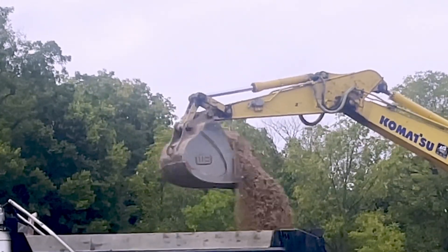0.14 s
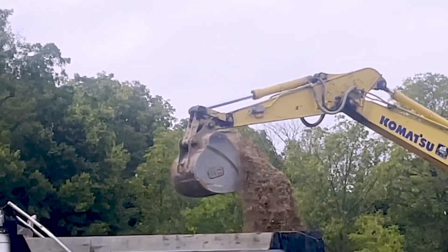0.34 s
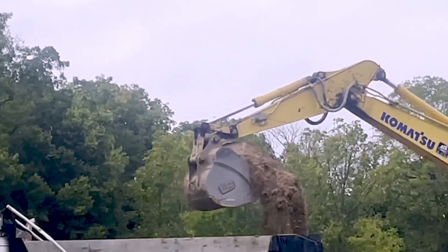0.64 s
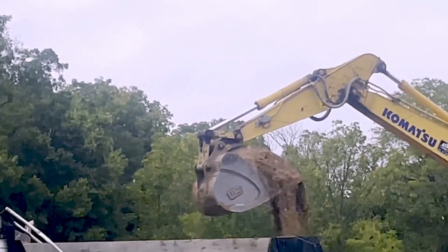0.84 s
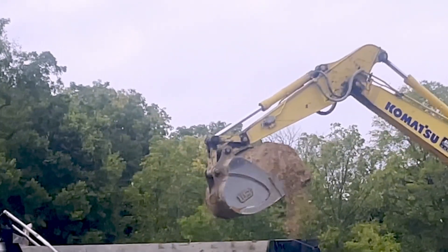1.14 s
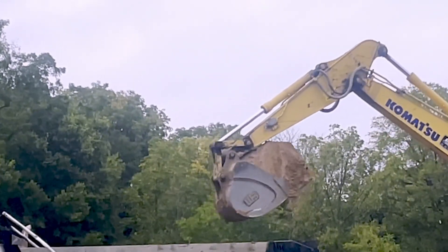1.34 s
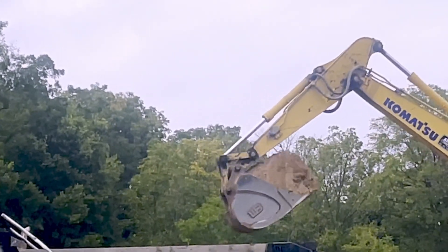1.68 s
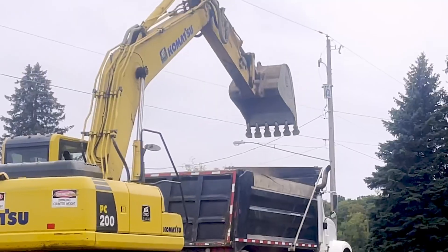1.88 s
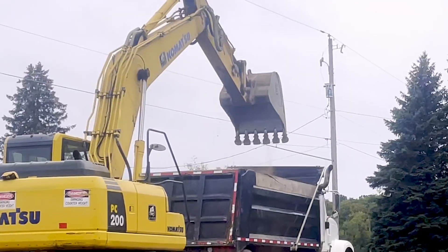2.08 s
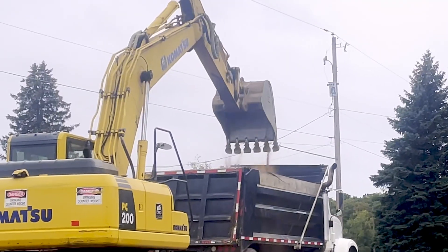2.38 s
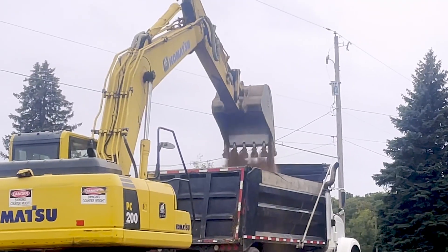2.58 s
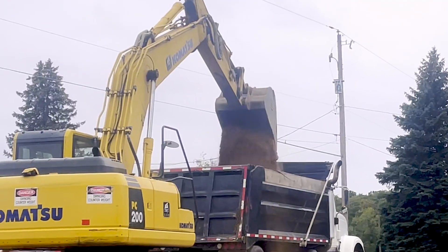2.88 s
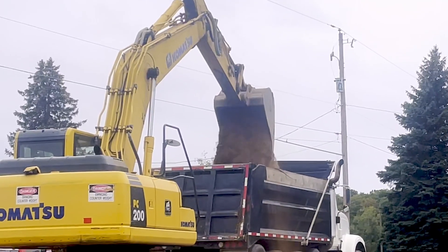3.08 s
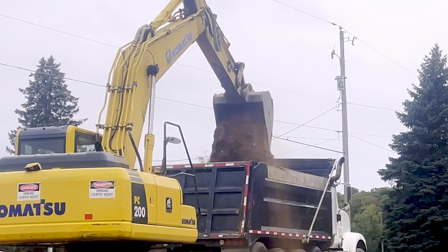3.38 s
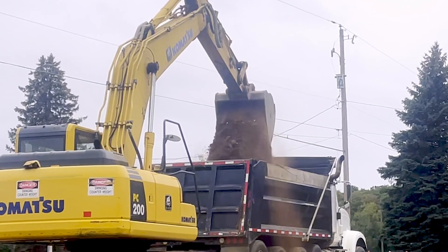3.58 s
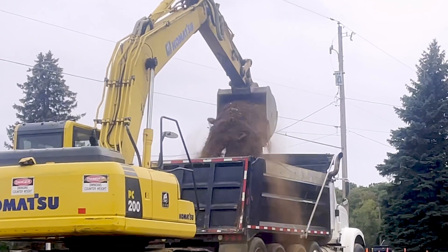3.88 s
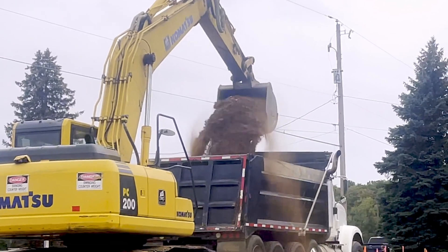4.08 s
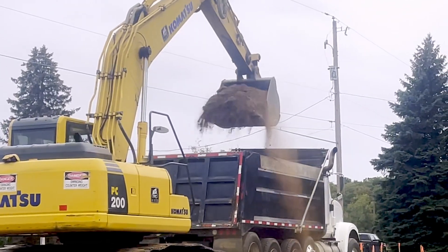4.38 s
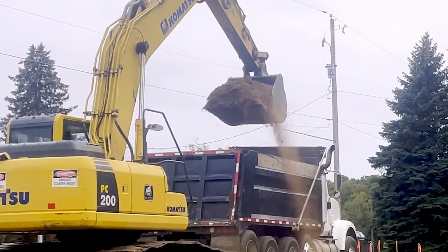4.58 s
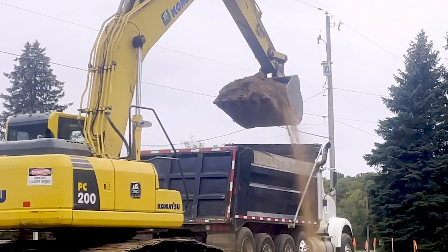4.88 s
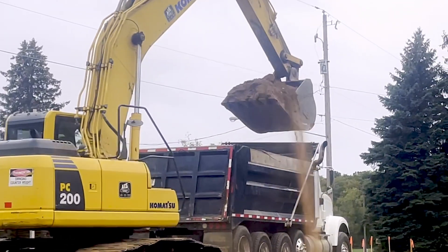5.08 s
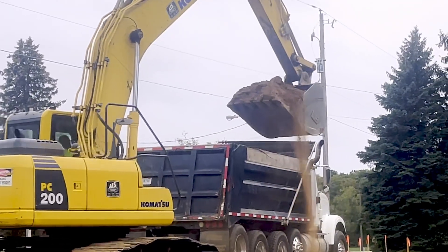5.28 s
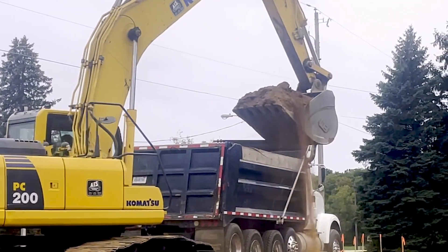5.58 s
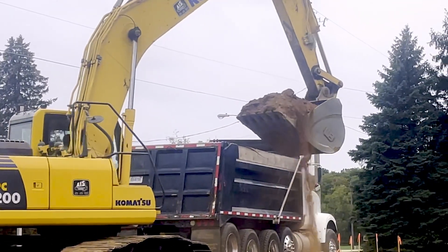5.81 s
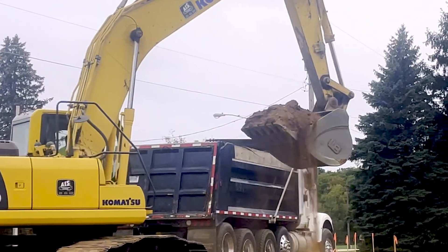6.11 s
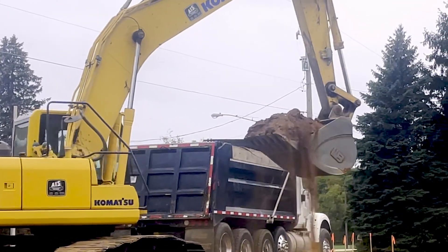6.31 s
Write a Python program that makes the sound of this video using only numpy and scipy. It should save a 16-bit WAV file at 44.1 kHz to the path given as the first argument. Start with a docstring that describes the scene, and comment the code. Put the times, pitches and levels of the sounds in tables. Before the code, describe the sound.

Outdoors, clods boom on a steel dump truck bed and dirt slides loudly, then thins out with a few knocks and a short rasp that sound played backwards. A diesel excavator throbs some way off. Before two seconds it jumps suddenly close, with a pump whine swelling on each stroke and a steady oil hiss. Light clanks and gritty ticks dot the engine noise, and the whine is strongest near the end.

```python
"""An excavator loading a truck, backwards

A diesel digger works over a steel dump truck with time running backwards: clods and stones swell out of
their own ring and stop dead on the blow, and the pour of dirt starts loud and thins away. The engine
throbs and the pump whines, first far off, then suddenly close, where oil hisses and the turbo whistles."""
import sys
import numpy as np
from scipy.fft import rfft, irfft, next_fast_len
from scipy.io import wavfile
from scipy.ndimage import map_coordinates

SR = 44100
rng = np.random.default_rng(int(sys.argv[2]) if len(sys.argv) > 2 else 0)


def dump(signal):
    """Clip the signal to [-1, 1] and save it as 16-bit WAV at the path in sys.argv[1]."""
    limited = np.clip(np.atleast_2d(signal).T, -1, 1)
    pcm = np.round(limited * 32767).astype(np.int16)
    wavfile.write(sys.argv[1], SR, pcm)


N = 284445
TIME = np.arange(N) / SR
CLOSE_S = 1.748  # the scene changes: from here on the digger is heard close by

# How often the cylinders fire: time_s, rate_hz
FIRING_RATE = [(0, 96), (.6, 95), (1.05, 97.8), (1.66, 97.8), (1.78, 95.1), (2.08, 94.8), (2.3, 97),
               (2.75, 99.9), (3.2, 99.7), (3.8, 97.2), (4.75, 96.9), (5.25, 94.4), (6.45, 94.3)]
# How loud the exhaust is from afar, close by, and in its close second harmonic: time_s, level_db
FAR_EXHAUST = [(0, -28.5), (.5, -30.5), (.9, -28.5), (1.3, -30.5), (1.74, -30)]
NEAR_EXHAUST = [(2.45, -21.5), (2.9, -21.5), (4.78, -23), (4.9, -20), (5.35, -20), (6.45, -22.5)]
SECOND_HARMONIC = [(1.75, -34), (2.55, -33), (2.8, -37.5), (3.3, -39), (3.8, -35.5), (5, -35), (5.4, -38),
                   (6.45, -38)]
# The exhaust's tones from afar, close by, and in its drone: multiple_of_firing_rate, level_db
FAR_TONES = [(4 / 6, -12), (5 / 6, -11.5), (0.98, 0), (8 / 6, -14), (11 / 6, -11), (2, -7.5),
             (13 / 6, -15.5), (16 / 6, -15), (17 / 6, -13), (3, -21), (20 / 6, -27)]
NEAR_TONES = [(1, 0), (8 / 6, -28), (10 / 6, -28), (11 / 6, -26), (13 / 6, -27), (17 / 6, -24),
              (20 / 6, -31)]
DRONE_TONES = [(16 / 6, -8), (17 / 6, 0)]
# Swells of the drone, just below the third harmonic: start_s, hold_s, level_db
DRONE_SWELLS = [(.12, .2, -35), (.82, .05, -37), (1.52, .1, -35.5), (1.68, .04, -32), (2.18, .15, -36),
                (2.45, .08, -40), (3.62, .15, -36.5), (4.05, .3, -41), (5.35, .65, -38)]
# The tone colour of the engine's rumble and clatter, far and near: pitch_hz, level_db
FAR_RUMBLE_COLOUR = [(20, -13), (60, 1), (150, 10), (290, 7.5), (400, -7.5), (700, -54)]
FAR_CLATTER_COLOUR = [(210, -42), (350, -9), (560, -6), (720, -7), (1000, -12), (1260, -8.5), (1660, -22),
                      (1900, -21), (3050, -19), (3900, -25.5), (5800, -23.5), (7700, -29), (9150, -11.5),
                      (9700, -25), (10800, -82), (12000, -75)]
NEAR_RUMBLE_COLOUR = [(13, -58), (22, -15), (43, -7), (70, 0.5), (97, -1), (121, -5.5), (145, -6.5),
                      (195, -6.5), (361, -18), (480, -44), (620, -59), (1060, -120)]
NEAR_CLATTER_COLOUR = [(220, -19), (380, -15.5), (460, -8.5), (498, -11.5), (568, -4.5), (616, -8),
                       (808, -6.5), (949, -15.5), (1310, -11), (1480, -17.5), (1810, -31), (2140, -24.5),
                       (2370, -33.5), (2540, -29.5), (4200, -33), (5460, -49), (9240, -120)]
# The digger drifts a little to the left and back as it swings: time_s, left_minus_right_db
SWING_PAN = [(0, -0.05), (2.2, 0.64), (2.7, 1.25), (3.7, 0.6), (4.7, 0.8), (5.3, 0)]
# Two stereo spreads for noise: pitch_hz, side_minus_middle_db
WIDE_SPREAD = [(100, -64), (500, -33), (1400, -16.5), (1750, 0.5), (2100, -1), (2700, 5.5), (3400, 4),
               (3750, 1), (4300, -21), (5300, -7.5), (6000, -24), (7200, -16), (8700, -31), (9250, -7),
               (10200, 13.5), (11000, -1), (11700, -17)]
NARROW_SPREAD = [(100, -14), (700, -20), (1700, -16), (2300, -26), (8700, -71), (9200, -1), (10200, 14),
                 (11000, 19), (11700, -28)]
# Arm and bucket strokes that load the pump: start_s, hold_s, level_db, ramp_db_per_s
ARM_STROKES = [(.78, .1, -28, 30), (1.46, .14, -34, 150), (1.752, .025, -27, 400), (1.89, .03, -31.5, 220),
               (2, .15, -33.5, 180), (2.3, .03, -31.5, 260), (2.57, .1, -34, 120), (2.68, .05, -31, 220),
               (2.76, .5, -29, 260), (3.55, .04, -31.5, 240), (4.49, .06, -32, 200),
               (4.93, .14, -32.5, 160), (5.235, .05, -28.5, 360), (5.38, .89, -25, 60), (5.47, .1, -23, 70)]
# Slides of dirt on the steel: start_s, hold_s, level_db
DIRT_SLIDES = [(.09, 0.085, -19.7), (.22, 0.06, -34), (.325, 0.025, -33), (.655, .02, -40),
               (2.768, 0.012, -41)]
# The tone colour of sliding dirt, the landing heap, struck steel and grit: pitch_hz, level_db
DIRT_COLOUR = [(160, -19), (290, 9), (450, -19), (590, -1), (760, -15), (1250, 3), (1680, -6.5), (2000, 1),
               (2800, 4.5), (4200, 2), (6200, -1.5), (7900, 4.5), (9700, -3), (10500, -56), (12000, -40)]
HEAP_COLOUR = [(110, -30), (200, -1), (310, -2), (420, -10), (590, -2), (760, -7), (1250, -5), (1650, -24),
               (3000, -45)]
STEEL_COLOUR = [(150, -16), (450, -16), (1300, 3), (3200, 2.5), (3900, -5), (8000, -7), (10500, -48)]
GRIT_COLOUR = [(2000, -3), (5000, 0), (7000, 2), (8500, 11), (9600, 6), (10500, -31)]
# The notes at which the truck bed rings: pitch_hz, width_hz, level_db
BED_NOTES = [(280, 40, 2), (570, 50, -7), (880, 40, 0), (989, 25, -1), (1199, 18, 6), (1276, 25, 4),
             (1355, 25, -1), (1899, 30, -1), (2065, 25, 0), (2390, 22, 0), (2760, 35, 4), (2865, 45, 0),
             (3123, 22, 2), (3428, 28, -1), (4215, 25, -2)]
# The booming notes of its floor: pitch_hz, level_db, share_of_ring_time
FLOOR_NOTES = [(221, -1, 1.9), (263.6, -0.5, 1.2), (348.6, -5.5, 1.9), (454, -15, 0.78), (599, -5.5, 1.1),
               (929, -0.5, 0.95), (980, -4.5, 1.3)]
# Clods striking the bed: time_s, ring_db, boom_db, ring_time_s
CLOD_BLOWS = [(0.019, -19, -8.5, 0.061), (0.037, -19, -4.5, 0.06), (0.28, -27.5, -37, 0.08),
              (.342, -28, -23.5, 0.16), (0.855, -32, -33, .08), (.873, -32, -34, 0.1),
              (1.266, -39, -49, .1), (1.304, -36.5, -41, 0.12), (2.355, -43, -37, 0.32),
              (2.78, -39, -39, 0.15), (2.82, -32, -49, 0.35), (4.109, -36, -48, 0.18),
              (4.241, -40.5, -50, 0.62)]
# Sprays of grit: time_s, level_db
GRIT_SPRAYS = [(.238, -30), (.35, -39), (.415, -35), (.675, -40), (.55, -38), (.626, -41.5), (2.48, -40),
               (2.65, -42.5), (3.452, -46), (3.8, -39.5), (4.125, -38), (4.239, -37)]
# The notes of the steel plate under a dragging stone: pitch_hz, width_hz, level_db
PLATE_NOTES = [(345, 12, 6), (465, 30, -2), (640, 30, 0), (830, 60, -5), (1010, 70, -3), (1220, 110, .5),
               (1390, 110, .5), (1640, 70, 1), (1890, 170, 1.5), (2620, 120, -8), (2830, 130, -1),
               (3310, 170, -5.5)]
# The hiss of oil flowing through the valves: time_s, level_db
OIL_FLOW = [(1.78, -42.5), (3.55, -43.5), (3.9, -40.5), (4.65, -39), (4.9, -42), (6.45, -43.5)]
# The tone colour of the oil and of the spool, the sliding part of a valve: pitch_hz, level_db
OIL_COLOUR = [(1760, -5.5), (3000, -22), (3380, -30), (3710, -3.5), (4250, -4.5), (5510, 1), (5890, -2),
              (6550, -2.5), (7010, -2), (7980, 7), (9390, 4), (10500, -22.5), (11500, -9), (15000, -127),
              (22000, -120)]
SPOOL_COLOUR = [(4000, -45), (4650, -13), (4850, -1), (5020, 6), (5250, -14), (5580, -1), (6000, -6),
                (7000, -42)]
# The turbocharger's whistle: time_s, pitch_hz, level_db
TURBO_WHISTLE = [(1.75, 11780, -59.5), (2.25, 11450, -59), (2.5, 11100, -63), (3.05, 11060, -64),
                 (3.3, 11290, -60), (3.8, 11350, -58.5), (4.52, 11610, -57), (4.85, 12030, -61),
                 (5.3, 12040, -64), (6.45, 12100, -66)]
# Single pebbles on the steel: time_s, level_db
PEBBLE_TICKS = [(2.652, -31.5), (2.774, -38), (3.453, -34), (3.508, -41), (3.804, -37), (4.121, -32),
                (4.228, -35.5), (4.247, -36.5)]
# The tone colour of a pebble's tick and of spilling sand: pitch_hz, level_db
TICK_COLOUR = [(5500, -26), (7400, -9), (8300, 0), (9300, -3), (10200, -30)]
SAND_COLOUR = [(1600, -17), (2200, -5), (3300, -26), (3900, -5.5), (4600, -2), (5600, -22), (7500, -20),
               (10000, -40)]
# The tones of a singing valve: starting_pitch_hz, width_hz, level_db
VALVE_TONES = [(4820, 150, -2), (5350, 220, -2.5)]


def amp(db):
    """Turn decibels into a gain to multiply by."""
    return np.exp(np.asarray(db) * (np.log(10) / 20))


def unit(x):
    """Scale a signal to an average (rms) level of 1."""
    return x / np.sqrt(np.mean(x ** 2) + 1e-20)


def along(points, hz):
    """Read between (pitch_hz, value) points on a musical, logarithmic scale."""
    pitches, values = np.transpose(points)
    return np.interp(np.log(hz + 1), np.log(pitches + 1), values)


def curves(rows):
    """One value per sample for each column after the time."""
    times, *columns = np.transpose(rows)
    return [np.interp(TIME, times, column) for column in columns]


def wobble(rate):
    """A smooth random curve through `rate` points a second."""
    knots = rng.standard_normal(int(N * rate / SR) + 4)
    fine = np.arange(0, len(knots) - 1, 1 / 16)
    return np.interp(TIME * rate, fine, map_coordinates(knots, [fine]))


def filtered(x, response):
    """Multiply each frequency in x by response(hz)."""
    size = next_fast_len(N + 8192)
    return irfft(rfft(x, size) * response(np.fft.rfftfreq(size, 1 / SR)), size)[..., :N]


def colour(points):
    """A filter response drawn through (pitch_hz, level_db) points."""
    return lambda hz: amp(along(points, hz))


def resonances(notes):
    """A filter response that rings at the given notes; np.conj turns the ring backwards in time."""
    return lambda hz: np.conj(sum(
        (-1) ** k * amp(db) * 1j * hz * width / (pitch ** 2 - hz ** 2 + 1j * hz * width)
        for k, (pitch, width, db) in enumerate(notes)))


def noise(response, spread, drive=1.0):
    """Stereo noise, level 1 in the middle: random pushes, sized by drive, through a filter."""
    pushes = rng.standard_normal((2, N)) * drive
    mid, side = filtered(pushes, lambda hz: response(hz) * amp([0 * hz, along(spread, hz)]))
    return np.array([mid + side, mid - side]) / np.std(mid)


def breathy(hz, width_hz):
    """An airy tone: a narrow band of noise around a moving pitch."""
    waver = wobble(width_hz) + 1j * wobble(width_hz)
    return unit(np.real(waver * np.exp(2j * np.pi * np.cumsum(hz) / SR)))


def swell(start_s, hold_s, rise, fall):
    """A gain that reaches 1 at start_s, holds, then drops; rise and fall are in dB per second."""
    below_db = rise * np.maximum(start_s - TIME, 0) + fall * np.maximum(TIME - start_s - hold_s, 0)
    return amp(-np.minimum(below_db, 200))


def swells(rows, rise, fall):
    """Follow the loudest of several (start_s, hold_s, level_db) swells."""
    return np.max([amp(db) * swell(start, hold, rise, fall) for start, hold, db in rows], axis=0)


def backwards(time_s, ring_s, stop_s=0.04):
    """A fade turned round: it climbs 60 dB in ring_s up to time_s, then drops 60 dB in stop_s."""
    return swell(time_s, 0, 60 / ring_s, 60 / stop_s)


def leftward(x, lead_db):
    """Make the bass and middle of a sound stronger on the left."""
    tilt = lambda hz: lead_db * along([(1000, 0.99), (2400, 0)], hz)
    return filtered(x, lambda hz: amp([tilt(hz) / 2, -tilt(hz) / 2]))


def exhaust(firings, tones, unsteady):
    """Unequal cylinders put restless tones between the steadier harmonics of the firing."""
    out = np.zeros(N)
    for multiple, db in tones:
        order = np.round(multiple * 6) / 6  # the pattern repeats every six firings
        waver = unsteady * (.17 if order == 1 else .28 if order == 2 else .6)
        in_step, out_of_step = 1 + waver * wobble(16), waver * wobble(16)
        phase = np.float32(2 * np.pi * (order * firings + rng.random()))
        out += amp(db) * unit(in_step * np.cos(phase) - out_of_step * np.sin(phase))
    return out


def engine(firings, near):
    """The diesel: exhaust tones, a low rumble, and a block that clatters with each firing."""
    cycle = 2 * np.pi * firings
    beat = amp(0.77 * np.cos(cycle) + .5 * np.cos(cycle / 6) + 1.15 * wobble(25))
    close = amp(curves(NEAR_EXHAUST)[0]) * exhaust(firings, NEAR_TONES, unsteady=0.55)
    close = close + amp(-30.5) * noise(colour(NEAR_RUMBLE_COLOUR), WIDE_SPREAD)
    close += amp(curves(SECOND_HARMONIC)[0]) * exhaust(firings, [(2, 0)], unsteady=0.9)
    close += amp(-34.5) * noise(colour(NEAR_CLATTER_COLOUR), WIDE_SPREAD, beat)
    afar = amp(curves(FAR_EXHAUST)[0]) * exhaust(firings, FAR_TONES, unsteady=0.72)
    afar = afar + amp(-34.5) * noise(colour(FAR_RUMBLE_COLOUR), NARROW_SPREAD)
    drone = exhaust(firings, DRONE_TONES, unsteady=0.8 - 0.4 * near)
    drone *= swells(DRONE_SWELLS, rise=80, fall=160)
    afar += amp(-40) * noise(colour(FAR_CLATTER_COLOUR), NARROW_SPREAD, beat)
    return near * close + (1 - near) * leftward(afar, lead_db=2) + drone


def pump(firings, near):
    """The oil pump's pistons whine at six times the firing rate, louder on each stroke of the arm."""
    idle = amp(-42.5 + 3 * wobble(18))
    strokes = [amp(db) * swell(start, hold, ramp, ramp) for start, hold, db, ramp in ARM_STROKES]
    flutter = 1 + 0.056 * np.cos(2 * np.pi * firings / 3)  # once per turn of the crankshaft
    working = np.max(strokes, axis=0) * flutter * amp(.7 * wobble(7) + .6 * wobble(40))
    lead = 0.17 * np.array([[1], [-1]])  # the whine reaches the left side a little earlier
    whine = unit(np.sin(2 * np.pi * 6 * firings + 0.11 * wobble(38) + lead))
    return amp(-7 * (1.5 - near)) * np.hypot(idle, working) * whine


def truck(near):
    """The waiting truck idles with a low, uneven throb."""
    phase = 2 * np.pi * np.cumsum(35.1 + 0.89 * wobble(4.08)) / SR
    low = amp(-48) * unit(np.sin(phase))
    octave = amp(-35 + 0.75 * wobble(4)) * unit(np.sin(2 * phase))
    return (low + octave) * amp(-4 * (1.5 - near))


def bed_ring(drive):
    """The truck bed rings freely as bare steel; after CLOSE_S, earth on its floor damps it."""
    return amp(-13 * (TIME > CLOSE_S)) * noise(resonances(BED_NOTES), NARROW_SPREAD, drive)


def dirt():
    """Grains skid over the steel and thin to a trickle; the main heap thuds and rings the bed."""
    slides = swells(DIRT_SLIDES, rise=125, fall=1100)
    trickle = amp(-29.5 - 18 * TIME)
    heap = swell(start_s=.036, hold_s=0, rise=420, fall=62)
    grains = amp(1.9 * wobble(600) + 1.1 * wobble(90))
    ring = np.hypot(amp(-4.5) * slides, amp(-23.5) * heap) * bed_ring(grains)
    thud = amp(-20.5) * heap * noise(colour(HEAP_COLOUR), NARROW_SPREAD, grains)
    skid = np.hypot(slides, trickle) * noise(colour(DIRT_COLOUR), NARROW_SPREAD, grains)
    return skid + ring + thud


def floor_boom():
    """The bed's floor booms under each clod, backwards: its notes grow up to the blow."""
    boom = np.zeros(N)
    for time_s, _, boom_db, ring_s in CLOD_BLOWS:
        before = np.flatnonzero(TIME < time_s)[-SR // 2:]
        left_s = time_s - TIME[before]
        notes = sum(amp(db - 60 * left_s / (ring_s * share)) * np.sin(2 * np.pi * hz * left_s)
                    for hz, db, share in FLOOR_NOTES)
        soft_push = 1 - np.exp(-left_s / 0.0043)  # soft earth takes a few milliseconds to press
        boom[before] += amp(boom_db) * notes * soft_push
    return boom


def clods_and_grit():
    """Each clod's steely ring and each spray of grit grows up to its blow and stops there."""
    ring_power = sum((amp(db) * backwards(time_s, ring_s)) ** 2 for time_s, db, _, ring_s in CLOD_BLOWS)
    grit_power = sum((amp(db) * backwards(time_s, ring_s=0.51)) ** 2 for time_s, db in GRIT_SPRAYS)
    crumble = amp(2.1 * wobble(500))
    steel = bed_ring(crumble) + amp(-4) * noise(colour(STEEL_COLOUR), NARROW_SPREAD, crumble)
    grit = noise(colour(GRIT_COLOUR), NARROW_SPREAD, crumble)
    return np.sqrt(ring_power) * steel + np.sqrt(grit_power) * grit


def dragging_stone(graze_s=.72, end_s=.871, bite_s=.018, dull_above_hz=4400):
    """A stone grazes the plate, then slips and catches along it in a ringing rasp that stops dead."""
    slips = amp(2.5 * wobble(370))
    graze = amp(-41.5) * swell(graze_s, end_s - graze_s, rise=175, fall=1700)
    bite = amp(-23) * swell(end_s - bite_s, bite_s, rise=175, fall=1700)
    plate = lambda hz: resonances(PLATE_NOTES)(hz) / np.hypot(1, (hz / dull_above_hz) ** 2)
    return np.hypot(graze, bite) * noise(plate, NARROW_SPREAD, slips)


def oil_hiss(firings):
    """Oil rushes through the valves; the spool's narrower hiss grows faster than the flow."""
    flow_db, = curves(OIL_FLOW)
    cycle = 2 * np.pi * firings
    flutter = amp(0.24 * np.cos(cycle) + 0.19 * np.cos(cycle / 6) + 0.64 * wobble(60))
    hiss = amp(flow_db) * noise(colour(OIL_COLOUR), WIDE_SPREAD, flutter)
    spool_db = -56.5 + 2.2 * (flow_db - flow_db.mean())
    return hiss + amp(spool_db) * noise(colour(SPOOL_COLOUR), WIDE_SPREAD, flutter)


def turbo():
    """The spinning turbocharger gives a thin, airy whistle that follows its speed."""
    hz, db = curves(TURBO_WHISTLE)
    return amp(db + 1.7 * wobble(11)) * breathy(hz, width_hz=110)


def pebbles():
    """Each pebble makes one short, high, backwards tick on the steel."""
    ticks = [amp(db) * backwards(time_s, ring_s=0.06, stop_s=0.015) for time_s, db in PEBBLE_TICKS]
    return np.max(ticks, axis=0) * noise(colour(TICK_COLOUR), NARROW_SPREAD)


def singing_valve(start_s=4.43, climb_hz_per_s=760):
    """A valve sings two airy, climbing tones while the oil flows fastest."""
    climb_hz = climb_hz_per_s * np.clip(TIME - start_s, 0, 1)
    tones = sum(amp(db) * breathy(hz + climb_hz, width) for hz, width, db in VALVE_TONES)
    return amp(-47.5) * swell(start_s, hold_s=.29, rise=110, fall=120) * tones


def sand_spill():
    """A thin stream of sand runs off the bucket and keeps pattering down the side of the truck."""
    stream = amp(-50) * swell(start_s=5.22, hold_s=0, rise=21, fall=0)
    patter = amp(2.6 * wobble(1200))
    return stream * noise(colour(SAND_COLOUR), WIDE_SPREAD, patter)


def scene():
    """Mix digger, truck and load; one engine speed drives exhaust, clatter and pump together."""
    slowing_hz = 6.04 * np.exp(-((TIME - 2.42) / 0.0904) ** 2)  # the engine strains as the bucket bites
    firings = np.cumsum(curves(FIRING_RATE)[0] - slowing_hz) / SR  # a running count
    near = np.clip((TIME - CLOSE_S) / 0.0034, 0, 1)  # 0 far off, 1 close by
    digger = engine(firings, near) + pump(firings, near)
    digger += near * oil_hiss(firings) + singing_valve() + near * turbo()
    load = dirt() + floor_boom() + clods_and_grit() + pebbles() + dragging_stone()
    load = leftward(load, lead_db=1.5) + sand_spill()
    pan_db, = curves(SWING_PAN)
    return digger * amp([pan_db / 2, -pan_db / 2]) + truck(near) + load


def record(dry, ceiling=.85, top_hz=12150):
    """The highest peaks are softly rounded off; nothing above top_hz is kept."""
    rounded = dry / (1 + np.abs(dry / ceiling) ** 6) ** (1 / 6)
    return filtered(rounded, lambda hz: hz < top_hz)


dry = scene()
out = record(dry)
dump(out)
```